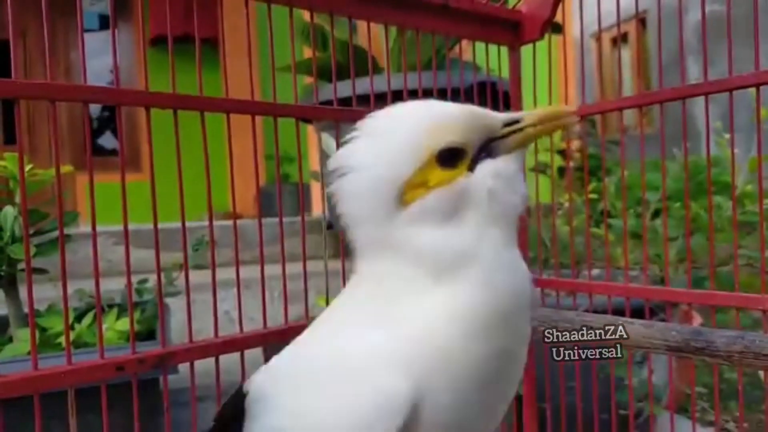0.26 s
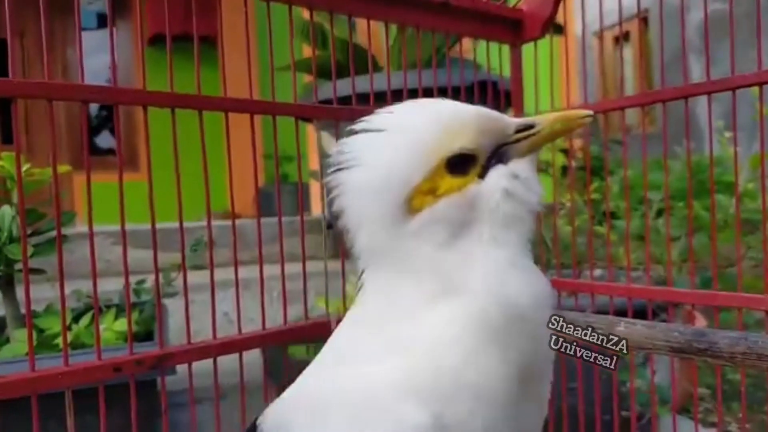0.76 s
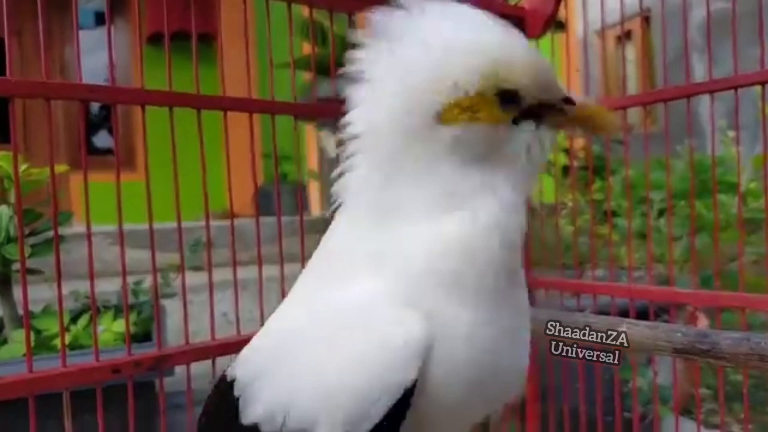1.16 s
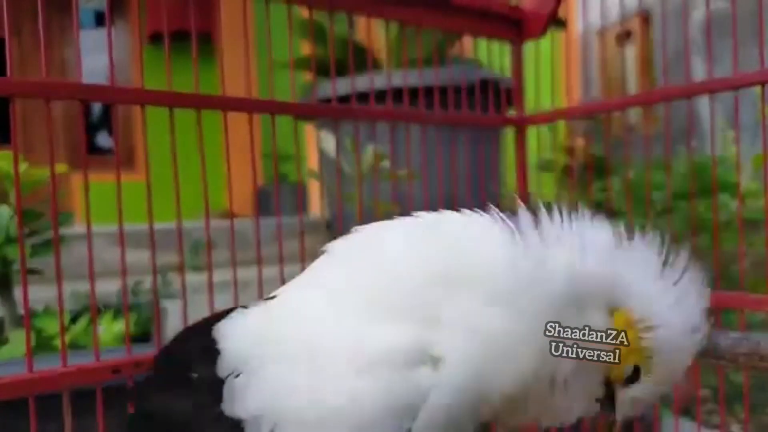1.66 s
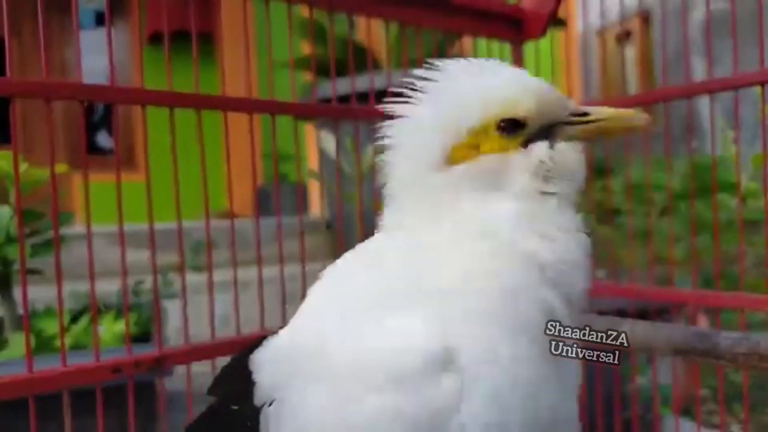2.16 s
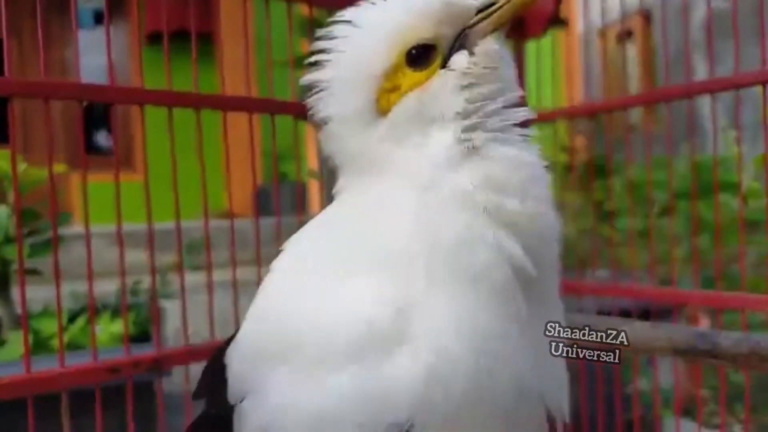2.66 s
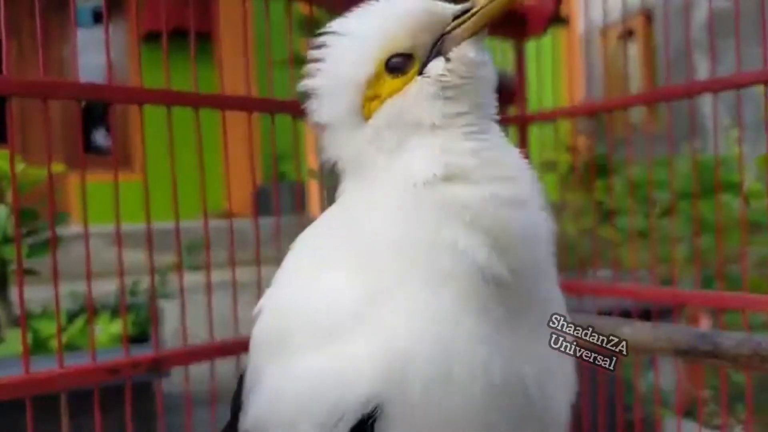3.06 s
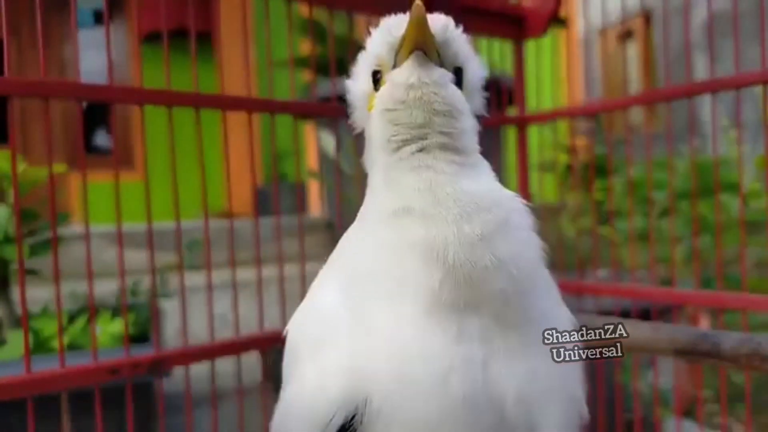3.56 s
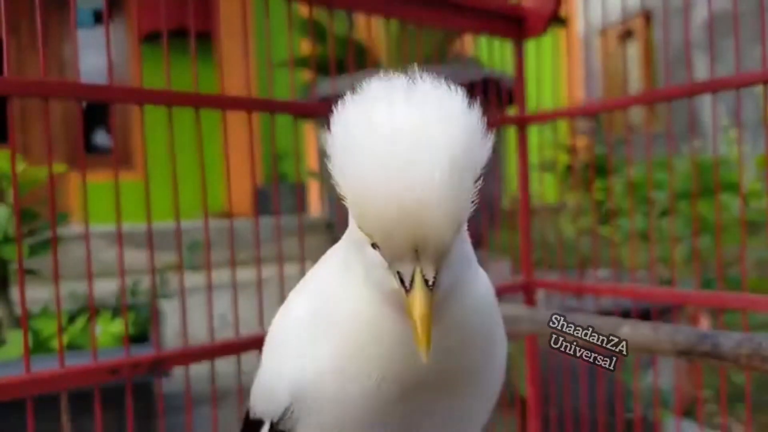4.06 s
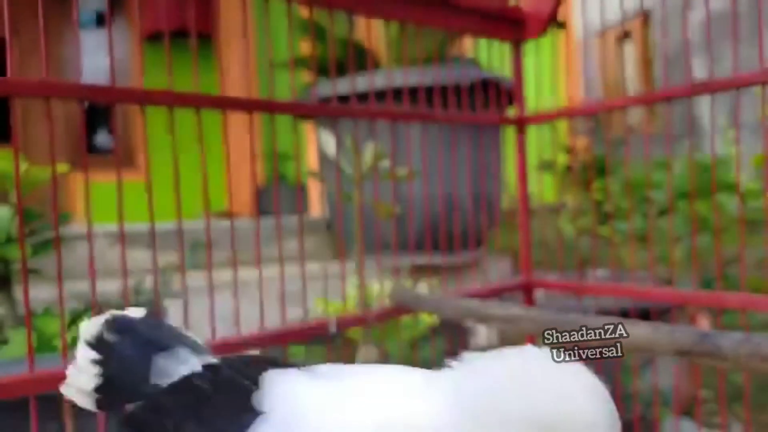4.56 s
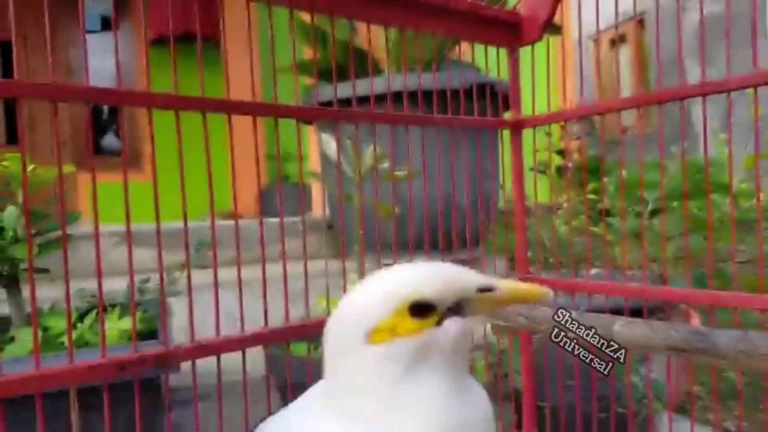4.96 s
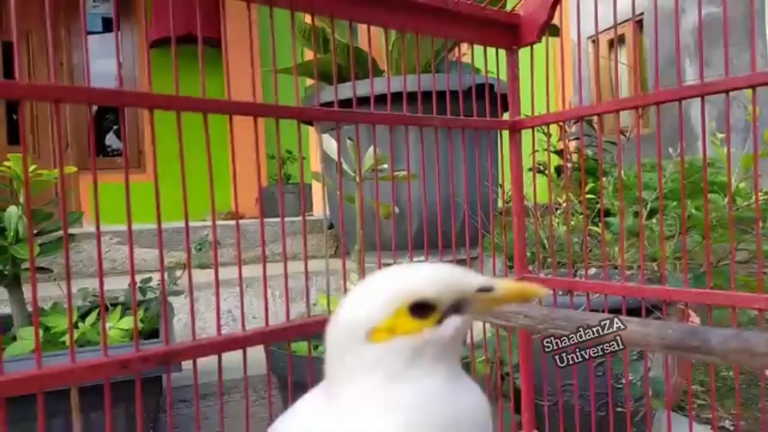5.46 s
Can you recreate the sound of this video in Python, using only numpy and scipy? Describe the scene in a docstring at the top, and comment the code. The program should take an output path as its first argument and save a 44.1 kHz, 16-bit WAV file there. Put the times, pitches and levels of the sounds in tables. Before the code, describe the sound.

A bird sings very close to a phone in a lightly echoing outdoor yard. At 0 s it gives a short, nearly level pure whistle, and at about 0.4 s another that slides downward, with small bill ticks between. From 0.7 to 1.4 s a second bird farther away trills eight short falling chirps, about ten a second. Woody clicks sound at 1.4 s, then sharper clicks at 1.7, 2.1 and 2.4 s each open a low, throaty rasp. Four brighter, harsher rasps follow at 2.7, 2.8, 3.2 and 3.3 s. Distant chirps return at 3.5 s and from 3.9 to 4.4 s. A tap comes at 4.5 s; from 4.9 s a softer whistle holds, then bends upward by 5.4 s with a faint tick. Underneath, a low motorbike drone flutters and gradually approaches; road hiss and clatter rise most after 5 s, while wind buffets the microphone, strongest around 4.4 to 5.3 s.

```python
"""Caged starling and approaching motorbike

A caged starling sings outdoors near a phone: sine whistles with faint overtones, then harsh rasps made
of irregular slaps ringing the throat plus hiss, some opened by a click of the bill. A bird farther off
trills short falling chirps, gliding sines that the yard echoes. A motorbike draws slowly nearer: engine orders
with noise that pulses slightly at the firing rate, over filtered road hiss; wind buffets the microphone."""
import sys
import numpy as np
from scipy import signal
from scipy.fft import rfft, irfft, next_fast_len
from scipy.io import wavfile
from scipy.ndimage import map_coordinates

SR = 44100
rng = np.random.default_rng(int(sys.argv[2]) if len(sys.argv) > 2 else 0)


def wav_record(signal):
    """Record a signal, one row per channel, as 16-bit PCM in the file named by sys.argv[1]."""
    frames = np.transpose(np.atleast_2d(signal))
    bounded = np.clip(frames, -1, 1)
    # unit amplitude maps onto the largest positive 16-bit level
    quanta = np.round(bounded * 32767).astype(np.int16)
    wavfile.write(sys.argv[1], SR, quanta)


def natural_amplitude(level_db):
    """Convert a level in decibels to a linear amplitude factor, elementwise."""
    exponent = np.asarray(level_db, float) / 20
    return 10 ** exponent


N = 251370
T = np.arange(N) / SR

# Tracks of the whistles, one list a whistle: time_s, pitch_hz, level_db
WHISTLES = [
    [(0.0, 1963, -19), (0.03, 1929, -14.5), (0.07, 1950, -19.5), (0.092, 1953, -15), (0.108, 1918, -16),
     (0.144, 1925, -20.5), (0.159, 1960, -26), (0.165, 1950, -45), (0.2, 1948, -48)],
    [(0.376, 1995, -40), (0.394, 2013, -19), (0.435, 2014, -16.5), (0.466, 1978, -15), (0.484, 2010, -17.5),
     (0.51, 1895, -24.5), (0.538, 1816, -20), (0.592, 1552, -20), (0.61, 1519, -21), (0.646, 1580, -59)],
    [(4.85, 2070, -51), (4.9, 2051, -34), (5.0, 1948, -27), (5.06, 1954, -24.5), (5.15, 1979, -24.5),
     (5.25, 1949, -24.5), (5.3, 1986, -24), (5.345, 2078, -20.5), (5.366, 2180, -26), (5.377, 2240, -40.5),
     (5.387, 2253, -22.5), (5.402, 2290, -22.5), (5.418, 2300, -43), (5.46, 2290, -55)],
]
# Overtones of a whistle: multiple, relative_db, flicker_db
OVERTONES = [(2, 0.5, 1.2), (3, -5, 1.2), (4, -10, 2), (7, -27, 2)]
# Overtone level of each whistle under its fundamental at full effort: relative_db
WHISTLE_EDGE_DB = [-34, -37, -60]

# Motorbike engine: time_s, firing_rate_hz, nearness_db
ENGINE = [(0, 21.3, 0.5), (.3, 22.4, 0.5), (1.2, 23.6, 2), (1.66, 23.5, 2.5), (1.9, 23.2, 3.5),
          (2.4, 23.9, 4), (3.1, 24.6, 9), (4.04, 24.9, 9.5), (4.27, 24.65, 12), (4.45, 25.3, 13),
          (4.65, 25, 11.5), (4.99, 24.9, 13), (5.22, 26.1, 15), (5.56, 24.4, 14.5), (5.7, 22.6, 22)]
# Multiples of the firing rate that are heard: order
ORDERS_HEARD = [4, 5, 6, 7, 8, 9, 10]
# Each order between its swells, at nearness 0: level_db
ORDERS_FAR_DB = [-62, -50.5, -38, -49, -61, -55, -50.5]
# Each order swells and fades irregularly, often several together, as the motorbike comes nearer,
# one list an order: time_s, width_s, peak_db
ORDER_SWELLS = [
    [(.24, .15, -39), (2.65, 0.17, -41), (3.56, 0.075, -32.5), (4.87, 0.16, -34), (5.7, .12, -36)],
    [(.2, 0.14, -45), (1.42, 0.12, -36.5), (2.2, .2, -31), (2.62, 0.25, -29.5), (3.09, 0.16, -30),
     (3.85, 0.42, -24.5), (5.0, .2, -31.5), (5.55, 0.36, -21.5)],
    [(.9, 0.27, -46), (1.66, .15, -37), (3.28, 0.18, -30), (4.55, 0.26, -32.5), (4.97, .2, -27.5),
     (5.7, .12, -24)],
    [(.2, 0.12, -42.5), (3.9, 0.16, -33.5), (4.51, 0.068, -40), (5.25, 0.16, -29.5)],
    [(1.19, 0.21, -48), (1.66, 0.2, -42.5), (2.97, .2, -39.5), (3.56, 0.089, -33), (4.5, .3, -35.5),
     (5.46, 0.19, -34.5)],
    [(3.09, 0.14, -46), (3.56, 0.1, -37), (4.04, 0.24, -37.5), (4.51, 0.2, -32.5), (4.99, .12, -29.5)],
    [(.95, 0.3, -48.5), (1.7, 0.45, -40), (2.45, 0.22, -41), (3.5, 0.22, -37.5), (4.04, 0.19, -40.5),
     (5.25, 0.32, -37), (5.7, .12, -44)],
]
# Spectrum of the exhaust's puffing noise: frequency_hz, relative_db
PUFF = [(70, -33), (100, 18.5), (250, 13), (300, 0), (420, 2), (520, -9.5), (700, -39.5)]
# Spectrum of the motorbike's clattering metal: frequency_hz, relative_db
CLATTER = [(450, -26.5), (650, -4.5), (950, 1.5), (1400, -5.5), (2000, -9.5), (2800, -37)]

# Swell of the road noise: time_s, swell_db
STREET = [(0, 4.5), (.3, 0), (.81, 1.5), (1.06, 0), (1.1, 1), (1.57, 0.5), (1.9, -1.5), (2.4, 2.5),
          (3.1, 7), (3.5, 5), (3.68, 9.5), (4.12, 10), (4.43, 10), (4.6, 11), (4.98, 14.5), (5.25, 13),
          (5.46, 21), (5.7, 20.5)]
# Spectra of the street's low, treble and highest noise: frequency_hz, relative_db
ROAD = [(400, -4), (600, -1.5), (1000, -2.5), (2000, -3.5), (3000, -7.5), (4000, -17), (5000, -38.5)]
TREBLE = [(2060, -40), (3500, -6.5), (5230, -6.5), (5760, -6.5), (7000, -7), (7600, -2.5), (8200, -8.5),
          (9440, -14), (11000, -10), (14300, -42.5), (22000, -120)]
SIZZLE = [(6470, -45), (11000, -27.5), (11600, -9.5), (14500, 1), (15500, 0.5)]
# Strength of the wind on the microphone: time_s, level_db
WIND = [(0, -37), (.27, -37), (.48, -47.5), (.69, -35), (.81, -47), (1.2, -45), (1.57, -43), (1.92, -47),
        (2.1, -41), (2.31, -39.5), (3.0, -42.5), (3.5, -48), (4.12, -39.5), (4.43, -31.5), (4.6, -35.5),
        (4.91, -25.5), (4.98, -32), (5.23, -28.5), (5.46, -40), (5.56, -33), (5.7, -40)]
# Spectrum of the wind's buffeting: frequency_hz, relative_db
BUFFET = [(3, -16), (12, -8), (20, -3.5), (38, 6), (70, 2), (90, -0.5), (120, -36), (200, -120)]

# Taps of bill and claws: time_s, level_db, knock_db (wooden knock over level_db)
TAPS = [(0.1694, -46.5, -9), (0.4994, -50, -16), (0.6589, -41.5, 1), (1.4062, -28, 16),
        (1.4654, -40.5, 22.5), (1.7365, -23, 8.5), (2.0572, -27, 11.5), (2.3945, -23, 9),
        (4.5376, -30.5, -8), (5.3834, -39, 4)]
# Spectrum of a tap's snap: frequency_hz, gain_db
SNAP = [(1180, -21), (2000, 5), (5030, -30), (7570, 2), (9830, -5.5), (14800, 3.5), (16000, -10)]
# Resonances of the perch: centre_hz, width_hz, gain_db
PERCH = [(378, 96, -6), (762, 89, 7), (1500, 230, -6.5), (2190, 150, -20.5)]

# Far chirps: drop_start_s, level_db, held_pitch_hz, hold_s, drop_s
CHIRPS = [(0.686, -31.5, 2933, 0.015, 0.015), (0.784, -31.5, 3070, 0.021, 0.026),
          (.875, -30.5, 2916, 0.02, 0.033), (.977, -27.5, 2790, .018, .022),
          (1.079, -29, 2795, 0.02, 0.025), (1.182, -27.5, 2765, 0.01, 0.015),
          (1.278, -28, 2632, .016, 0.022), (1.381, -27.5, 2660, .016, 0.027),
          (3.537, -30.5, 3100, 0.021, 0.024), (3.638, -33, 2780, .012, .016),
          (3.88, -30.5, 2787, .02, 0.0147), (3.974, -29.5, 2764, .024, 0.017),
          (4.065, -26.5, 2835, .015, .021), (4.162, -26.5, 2730, 0.012, 0.02),
          (4.267, -27, 2700, .014, .024), (4.359, -26, 2707, .013, 0.019)]

# Low rasps, bill nearly shut, and full rasps, bill open:
# start_s, length_s, chest_db, opening_db (added most at mid-rasp), throb_s (a reference instant of the
# throbbing: strongest in full rasps, weakest in the faintly throbbing low ones)
LOW_RASPS = [(1.735, 0.14, -22, -0.5, 1.5), (2.056, 0.14, -21, 0, 2.098), (2.394, 0.14, -21, 0.5, 2)]
FULL_RASPS = [(2.706, 0.1, -18, -5.5, 2.7485), (2.842, 0.12, -18.5, 1, 2.898),
              (3.186, 0.14, -19, -3.5, 3.248), (3.344, 0.13, -21, 3, 3.406)]
# Course of every rasp: share_of_length, relative_db (chest), opening_db
LOW_COURSE = [(0, -9, 6.5), (.08, -7, 1), (.2, -3.5, -2.5), (.34, 0.5, 2), (.47, -1.5, 4.5), (.6, -2, -2.5),
              (.73, -10, -3), (.87, -19, -7), (1, -26, -2.5)]
FULL_COURSE = [(0, -27, -3), (.08, -9.5, 2.5), (.24, -2, -1), (.45, 0.5, 2), (.65, 1, -1),
               (.83, -5.5, -7.5), (1, -25, -15)]
# Throat resonances: centre_hz, width_hz, relative_db
LOW_THROAT = [(338, 53, -5.5), (639, 60, 6), (817, 206, 1), (1416, 126, 1.5), (2920, 310, -27)]
FULL_THROAT = [(588, 71, 0.5), (890, 390, -1), (1400, 234, 4.5), (2463, 320, 4.5), (3240, 600, -35)]
# Spectra of the rasps' middle hiss and top hiss: frequency_hz, relative_db
LOW_HISS = [(3300, -11), (4200, -15), (5500, -26), (6300, -4.5), (7500, 3), (9200, -5), (10500, -14),
            (12000, -24)]
FULL_HISS = [(2800, 1), (3300, 8), (4200, 0), (7800, -2), (8100, -18), (9500, -19.5), (11500, -12),
             (12000, -14)]
LOW_TOP_HISS = [(12000, -28), (13300, -10), (14200, 5), (15300, 0), (15700, -40)]
FULL_TOP_HISS = [(11700, -43), (12300, 0.5), (14000, -3), (15300, 5.5), (15700, -40)]

# Decay of the yard's echoes: frequency_hz, t60_s
YARD = [(500, 0.27), (2500, 0.37), (8000, 0.18)]


def unit(x):
    """Normalisation: scales a signal to an rms of 1."""
    return x / np.sqrt(np.mean(x ** 2) + 1e-20)


def curves(rows):
    """Linear interpolation: one value per sample for each column after the time."""
    s, *columns = np.transpose(rows)
    return [np.interp(T, s, column) for column in columns]


def gate(rows, fade_s=0.00083):
    """Windowing: 1 while a call lasts, with short fades against clicks."""
    since_start = T - rows[0][0] + fade_s
    until_end = rows[-1][0] - T
    return np.clip(np.minimum(since_start, until_end) / fade_s, 0, 1)


def along(points, hz):
    """Logarithmic frequency scale: interpolates (frequency, value) points on a log axis."""
    f, v = np.transpose(points)
    return np.interp(np.log(hz + 1), np.log(f + 1), v, left=v[0], right=v[-1])


def wobble(rate):
    """Band-limited fluctuation: a smooth random curve with rate knots a second."""
    knots = rng.standard_normal(int(N * rate / SR) + 4)
    return map_coordinates(knots, [T * rate])


def filtered(x, response):
    """Convolution theorem: multiplies the spectrum of x by a response of frequency."""
    m = next_fast_len(N + SR // 2)
    return irfft(rfft(x, m) * response(np.fft.rfftfreq(m, 1 / SR)), m)[:N]


def coloured(x, spectrum):
    """Spectral shaping: x through (frequency, dB) points, silent outside them."""
    def response(hz):
        inside = (hz >= spectrum[0][0]) * (hz <= spectrum[-1][0])
        return natural_amplitude(along(spectrum, hz)) * inside
    return filtered(x, response)


def resonant(x, modes):
    """Modal resonance: x through parallel damped modes of alternating sign."""
    def response(f):
        total = 0
        for k, (centre, width, db) in enumerate(modes):
            damping = 1j * f * width
            total = total + (-1) ** k * natural_amplitude(db) * damping / (centre ** 2 - f ** 2 + damping)
        return total
    return filtered(x, response)


def whistles():
    """Periodic vibration of one clean membrane: a sine whose faint overtones grow with effort."""
    bill_hz, bill_width_hz, bill_peak_db = 7693, 90, 17
    full_effort_db, edge_db_per_db, edge_db_per_octave = -15.5, 0.26, 45
    out = np.zeros(N)
    for rows, edge_db in zip(WHISTLES, WHISTLE_EDGE_DB):
        hz, db = curves(rows)
        phase = 2 * np.pi * np.cumsum(hz * (1 + 0.0014 * wobble(40))) / SR
        # a narrow resonance, tuned by the fourth overtone, lifts multiples above 3
        bill_db = bill_peak_db / (1 + ((4 * hz - bill_hz) / bill_width_hz) ** 2)
        overtones = np.zeros(N)
        for k, level_db, flicker_db in OVERTONES:
            overtone_db = level_db + (k > 3) * bill_db + flicker_db * wobble(25)
            overtones += natural_amplitude(overtone_db) * np.sin(k * phase)
        effort_db = edge_db_per_db * (db - full_effort_db)
        pitch_db = edge_db_per_octave * np.log2(hz / rows[0][1])
        overtones *= natural_amplitude(edge_db + effort_db + pitch_db)
        level = natural_amplitude(db + 0.93 * wobble(63))
        out += gate(rows) * level * np.sqrt(2) * (np.sin(phase) + overtones)
    return out


def motorbike():
    """Harmonic series of the firing rate: unsteady orders, plus noise that pulses slightly at that rate."""
    rate, near_db = curves(ENGINE)
    phase = 2 * np.pi * np.cumsum(rate) / SR
    tones = np.zeros(N)
    for k, far_db, swells in zip(ORDERS_HEARD, ORDERS_FAR_DB, ORDER_SWELLS):
        size = natural_amplitude(far_db + 0.18 * near_db)
        for s, width, db in swells:
            size = size + natural_amplitude(db) * np.exp(-((T - s) / width) ** 2)
        tones += size * natural_amplitude(1.87 * wobble(9)) * np.cos(k * phase + 0.62 * wobble(5.5))
    puffs = coloured((1 + 0.18 * np.cos(phase)) * rng.standard_normal(N), PUFF)
    clatter = coloured((1 + 0.096 * np.cos(phase)) * rng.standard_normal(N), CLATTER)
    swell_db, = curves(STREET)
    clatter_db = -40 + 1.47 * (swell_db - 20)  # rises out of the road noise only from close by
    puffing = natural_amplitude(-40 + near_db) * unit(puffs)
    clattering = natural_amplitude(clatter_db + 0.87 * wobble(21)) * unit(clatter)
    return np.sqrt(2) * tones + puffing + clattering


def street():
    """Broadband noise of tyres and road, with treble hiss in two shades, all following one swell."""
    swell_db, = curves(STREET)
    road_noise, treble_noise, sizzle_noise = rng.standard_normal((3, N))
    road_db = -52 + 0.55 * swell_db
    road = natural_amplitude(road_db + 0.85 * wobble(7)) * unit(coloured(road_noise, ROAD))
    # a floor of fine hiss stays when the road is quiet
    treble_level = np.hypot(natural_amplitude(-67.5 + 0.97 * swell_db), natural_amplitude(-61.5))
    treble = treble_level * natural_amplitude(2.2 * wobble(3.84)) * unit(coloured(treble_noise, TREBLE))
    sizzle_db = -64 + 0.99 * swell_db
    sizzle = natural_amplitude(sizzle_db + 0.8 * wobble(7)) * unit(coloured(sizzle_noise, SIZZLE))
    return road + treble + sizzle


def wind():
    """Turbulent pressure at the microphone: low-frequency noise that comes in lumps."""
    strength_db, = curves(WIND)
    buffeting = unit(coloured(rng.standard_normal(N), BUFFET))
    return natural_amplitude(strength_db + 1.9 * wobble(12)) * buffeting


def taps():
    """Impact excitation: a broad snap, and a blow that rings the perch's hollow modes."""
    snap, blows = np.zeros(N + SR), np.zeros(N + SR)
    t = np.arange(SR // 8) / SR
    for s, db, knock_db in TAPS:
        snap_noise, scrape_noise = rng.standard_normal((2, len(t)))
        start = round(s * SR)
        click = natural_amplitude(db - 7 - 60 * t / 0.023)
        rattle = natural_amplitude(db - 16.5 - 60 * t / 0.087)  # the bars rattle on
        snap[start:][:len(t)] += (click + rattle) * snap_noise
        push = natural_amplitude(9 - 60 * t / 0.0017)
        scrape = natural_amplitude(2 - 60 * t / 0.14) * scrape_noise
        blows[start:][:len(t)] += natural_amplitude(db + knock_db) * (push + scrape)
    return coloured(snap[:N], SNAP) + resonant(blows[:N], PERCH)


def chirps():
    """Frequency glide with early reflections: a swelling held pitch drops fast, fluttering and fading."""
    end_hz, held_db, fade_db, flutter_db = 1720, -2.5, -17, 2.2
    out, t, flutter = np.zeros(N + SR), np.arange(SR // 10) / SR, wobble(260)
    for s, db, hz, hold, fall in CHIRPS:
        rise = np.clip(t / hold, 0, 1)
        drop = np.clip((t - hold) / fall, 0, 1)
        pitch = hz * (1 - 0.024 * rise ** 2) * (end_hz / hz) ** drop ** 1.317
        start = round((s - hold) * SR)
        begun = np.clip((t - hold) / 0.003 + 0.5, 0, 1)  # 0 to 1 around the start of the drop
        flutter_now_db = flutter_db * (0.3 + 0.7 * begun) * flutter[start:][:len(t)]
        fading = natural_amplitude(held_db * (1 - begun) + fade_db * drop ** 1.15 + flutter_now_db)
        ending = np.clip((hold + fall - t) / 0.004, 0, 1)
        shape = np.sin(rise * np.pi / 2) * fading * ending
        out[start:][:len(t)] += natural_amplitude(db) * shape * np.sin(2 * np.pi * np.cumsum(pitch) / SR)
    # close walls scatter the sound and repeat it at these delays (s, dB), the first being direct
    walls = natural_amplitude(-28.5 - 60 * t / 0.13) * rng.standard_normal(len(t))
    for s, db in [(0, 3.5), (.007, -7.5), (.012, -11), (.018, -13), (.026, -15), (.04, -14), (.072, -17.5)]:
        walls[round(s * SR)] = natural_amplitude(db)
    return signal.fftconvolve(out, walls)[:N]


def rasps(calls, course, throat, hiss, top_hiss, low_hz, rate, scatter_db, surge_db,
          throb_hz, throb_db, shut_db, opens, top_late_db):
    """Aperiodic source and filter: membrane slaps at random instants ring the throat and spurt hiss.

    A wider bill lets out more mouth ring, mid hiss and top hiss: each is shut_db over the chest,
    plus its share in opens of the opening. rate is in slaps a second."""
    surge = natural_amplitude(surge_db * wobble(120))
    struck = rng.random(N) < rate / SR
    slaps = struck * rng.choice([-1, 1], N) * natural_amplitude(scatter_db * rng.standard_normal(N)) * surge
    rung = resonant(slaps, throat)

    def upper(hz):
        return 1 / (1 + (1800 / (hz + 1)) ** 10)

    chest = unit(filtered(rung, lambda hz: (1 - upper(hz)) / (1 + (low_hz / (hz + 1)) ** 12)))
    mouth = unit(filtered(rung, lambda hz: upper(hz) / (1 + (hz / 3300) ** 8)))
    spurt = unit(slaps) * 0.099 + surge * rng.standard_normal(N)
    # each hiss band also flickers on its own, by 2.5 dB
    mid = unit(natural_amplitude(2.5 * wobble(45)) * coloured(spurt, hiss))
    top = unit(natural_amplitude(2.5 * wobble(45)) * coloured(spurt, top_hiss))
    out = np.zeros(N)
    for s, length, peak_db, widest_db, throb_s in calls:
        rows = [(s + share * length, peak_db + db, open_db + widest_db * np.sin(np.pi * share))
                for share, db, open_db in course]
        db, open_db = curves(rows)
        mouth_db, mid_db, top_db = (level_db + slope * open_db for level_db, slope in zip(shut_db, opens))
        top_db = top_db - top_late_db * np.clip(1 - (T - s) / (0.35 * length), 0, 1)  # comes in late
        throb = unit(natural_amplitude(throb_db * np.cos(2 * np.pi * throb_hz * (T - throb_s))))
        ring = throb * (chest + natural_amplitude(mouth_db) * mouth)
        breath = throb ** 0.81 * (natural_amplitude(mid_db) * mid + natural_amplitude(top_db) * top)
        out += gate(rows) * natural_amplitude(db) * (ring + breath)
    return out


def yard(x):
    """Reverberation: the walls answer with a diffuse tail, each frequency dying at its own speed."""
    hz, t, z = signal.stft(rng.standard_normal(SR // 2), SR, nperseg=256)
    decay = natural_amplitude(-60 * t / along(YARD, hz)[:, None])
    tail = signal.istft(z * decay, SR, nperseg=256)[1]
    delayed = np.pad(x, (200, 0))  # samples
    return signal.fftconvolve(delayed, tail / np.linalg.norm(tail))[:N]


def scene():
    """Superposition: near and far birds, their echoes, the motorbike, the street and the wind add up."""
    low = rasps(LOW_RASPS, LOW_COURSE, LOW_THROAT, LOW_HISS, LOW_TOP_HISS, low_hz=275, rate=1800,
                scatter_db=0.7, surge_db=1.2, throb_hz=63.6, throb_db=-0.6,
                shut_db=(-12, -18, -18), opens=(1.1, 0.9, 0.6), top_late_db=1.5)
    full = rasps(FULL_RASPS, FULL_COURSE, FULL_THROAT, FULL_HISS, FULL_TOP_HISS, low_hz=556, rate=2400,
                 scatter_db=0.4, surge_db=0.5, throb_hz=50.5, throb_db=1.5,
                 shut_db=(-2.5, -12, -12), opens=(1.05, 0.95, 0.7), top_late_db=12)
    near = whistles() + taps() + low + full
    far = chirps()
    echoes = yard(natural_amplitude(-22) * near + natural_amplitude(-9.5) * far)
    return (near + far + echoes + motorbike() + street() + wind())[None]


def low_pass(x):
    """Removes everything above the highest recorded frequency."""
    return signal.sosfilt(signal.butter(12, 16690, fs=SR, output="sos"), x)


def record(dry):
    """Soft saturation and band limiting: the phone rounds off the highest peaks and cuts above 15600 Hz."""
    rounded = dry[0] / (1 + np.abs(dry[0] / 0.9) ** 4) ** (1 / 4)
    mix = filtered(rounded, lambda hz: 1 / (1 + (hz / 15600) ** 200))[None]
    return low_pass(mix)


dry = scene()
out = record(dry)
wav_record(out)
```